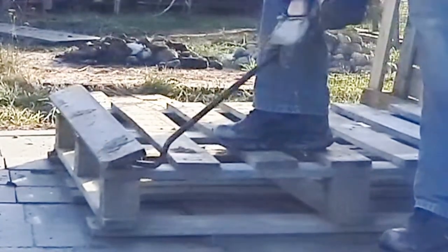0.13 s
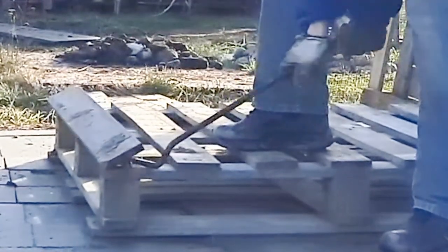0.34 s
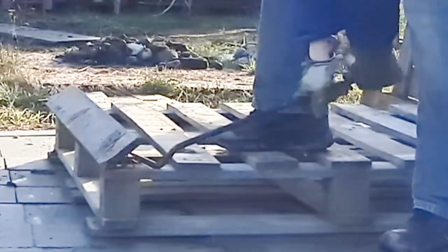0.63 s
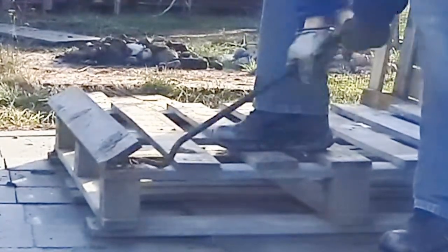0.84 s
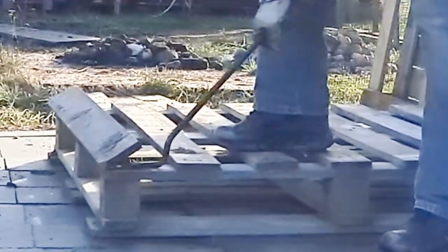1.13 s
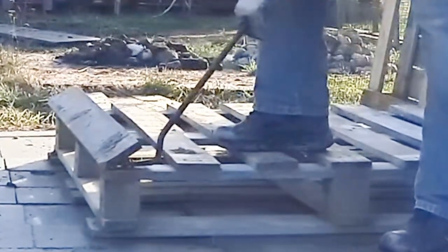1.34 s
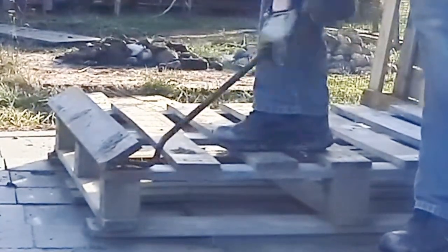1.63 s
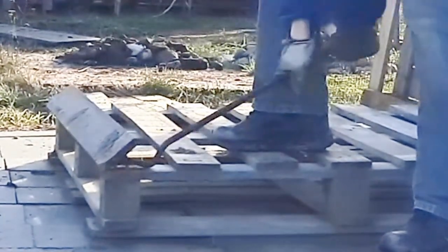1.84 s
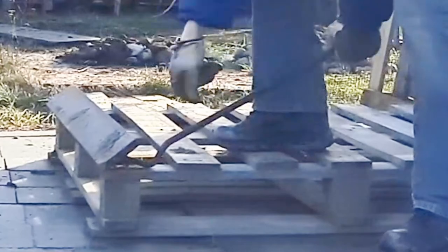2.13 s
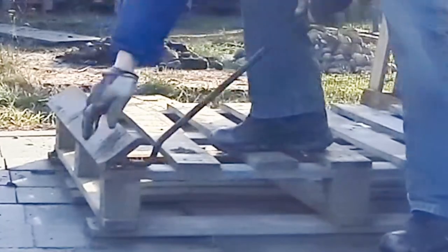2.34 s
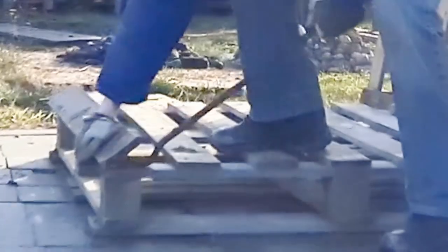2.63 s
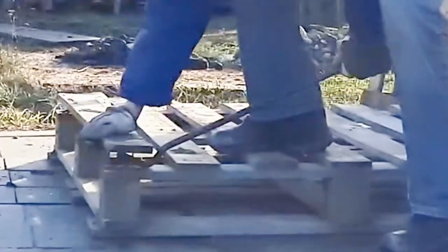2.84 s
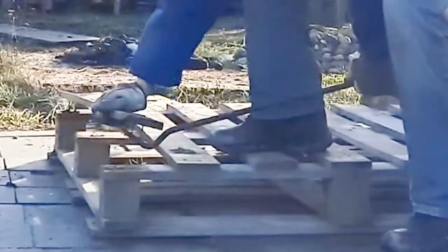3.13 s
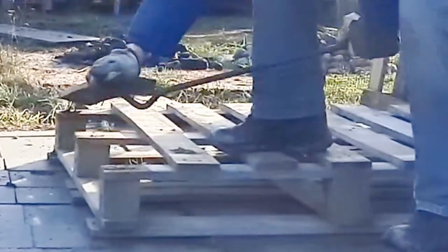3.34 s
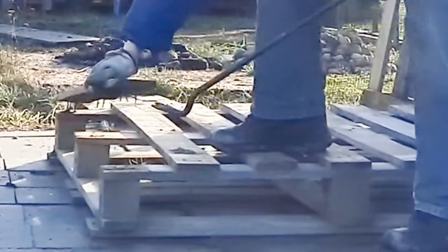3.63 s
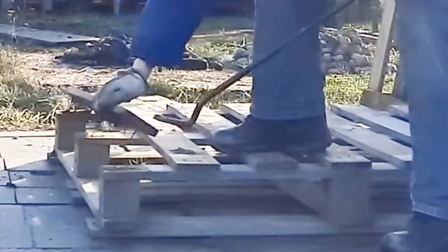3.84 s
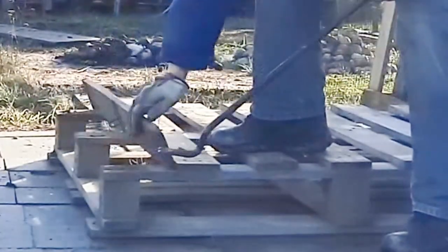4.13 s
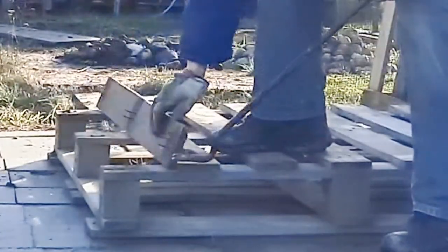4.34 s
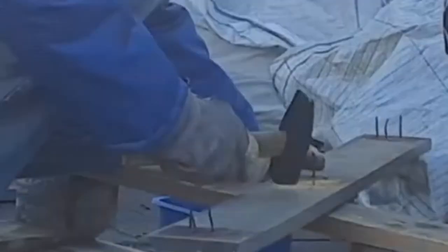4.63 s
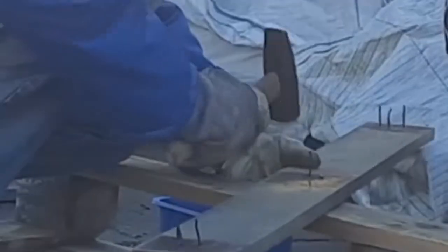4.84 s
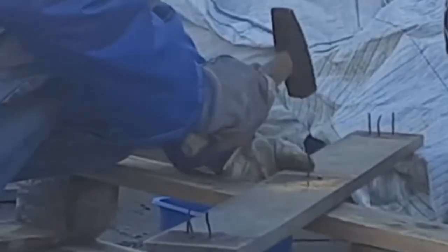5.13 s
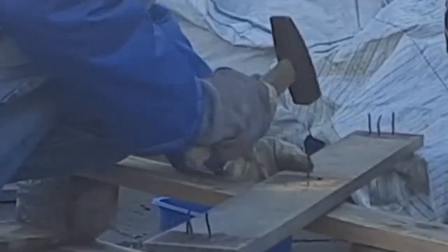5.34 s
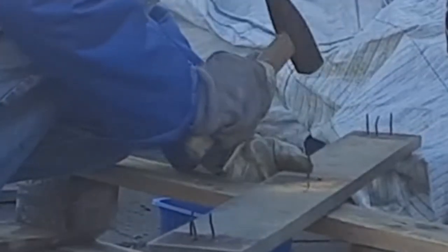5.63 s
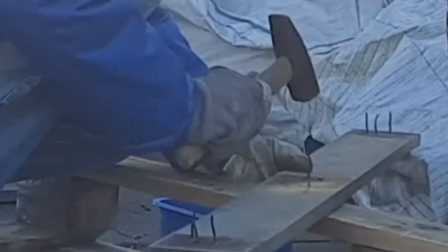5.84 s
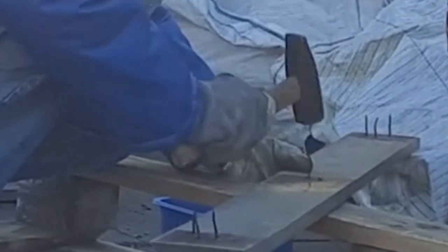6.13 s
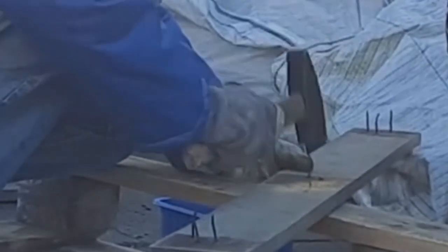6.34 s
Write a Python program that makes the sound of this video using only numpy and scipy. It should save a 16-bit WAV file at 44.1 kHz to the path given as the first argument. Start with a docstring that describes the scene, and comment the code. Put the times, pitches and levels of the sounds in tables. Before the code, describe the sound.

Quiet yard with low rumble and faint hiss. Steel bites and drags on dry timber, with small squeaks and uneven knocks slightly left of centre, until the board comes free and drops hard on the slats. The place changes to a close view slightly right: four evenly spaced, much louder hammer knocks on a nailed board, a brief nail rattle, and low wind buffets on the microphone.

```python
"""Prying a pallet and hammering out a nail

Outdoors, a steel crowbar bites, scrapes and knocks as it levers a board off an old pallet; the board drops on the slats.
Then, close by, a hammer drives a nail back out of the board in four blows while gusts buffet the microphone.
Impacts are bursts of dense noise modes plus decaying sines; friction, the nail's ping and buzz, and wind are shaped noise.
A low outdoor rumble and a faint hiss lie under everything.
"""
import sys
import numpy as np
from scipy import signal
from scipy.fft import rfft, irfft, next_fast_len
from scipy.io import wavfile
from scipy.ndimage import map_coordinates

SR = 44100
rng = np.random.default_rng(int(sys.argv[2]) if len(sys.argv) > 2 else 0)


def store_pcm(level_fs):
    """Save levels as 16-bit WAV."""
    pcm = np.round(np.clip(level_fs, -1, 1) * 32767).astype(np.int16)
    wavfile.write(sys.argv[1], SR, np.atleast_2d(pcm).T)


N = 286205
TIME = np.arange(N) / SR

# Clear modes of the board. Each row: frequency in Hz, level in dB against the contact's drive, T60 in seconds.
BOARD_MODES = [(343.4, -2.5, 0.17), (356, 1, 0.1), (444, -19.5, 0.3), (535, -16.5, 0.063),
               (581.6, -13, 0.15), (697, -29.5, 0.32), (808, 1, 0.17), (911, -9.5, 0.15), (1087, -16, 0.14),
               (1210, -16.5, 0.039), (1292, -13.5, 0.13), (1425, -18.5, 0.15), (1791, 7, 0.047),
               (2090, -3.5, 0.069), (2223, -3, 0.061), (3150, -15.5, 0.097), (3370, -16, 0.12),
               (6200, 0.5, 0.025), (7420, -0.5, 0.037), (7100, -4, 0.046)]
# Damping of the dense timber modes. Each row: frequency in Hz, usual T60 in seconds.
WOOD_DECAY = [(250, 0.33), (700, 0.19), (1500, 0.11), (4000, 0.19), (7000, 0.12), (14000, 0.1)]
# Borders in Hz between the five zones of a contact: thud, knock, crack, snap and tick.
ZONE_EDGES_HZ = [700, 1600, 4500, 9000]


def from_db(db):
    """The decibel is logarithmic: 20 dB is a factor of ten in amplitude."""
    return 10 ** (np.asarray(db) / 20)


def rms_one(x):
    """Normalise to unit mean power."""
    return x / np.sqrt(np.mean(x ** 2) + 1e-20)


def at_hz(points, hz):
    """Interpolate a table along log frequency, the scale of pitch."""
    known, values = np.transpose(points)
    return np.interp(np.log(np.maximum(hz, 1)), np.log(known), values)


def noise(colour, likeness=((100, 0), (1000, 0))):
    """Coloured stereo noise: mixing independent mid and side parts sets the channels' correlation; rms 1."""
    size = next_fast_len(N)
    hz = np.fft.rfftfreq(size, 1 / SR)
    mid, side = rfft(rng.standard_normal((2, size))) * from_db(at_hz(colour, hz))
    alike = np.clip(at_hz(likeness, hz), -1, 1)
    spectrum = np.sqrt(1 + alike) * mid + np.sqrt(1 - alike) * side * [[1], [-1]]
    return rms_one(irfft(spectrum, size)[:, :N])


def flicker(rate, depth_db):
    """Random amplitude modulation: a gain drawn `rate` times a second and joined by lines in dB; rms 1."""
    points = np.arange(0, TIME[-1] + 1, 1 / rate)
    return rms_one(from_db(depth_db * np.interp(TIME, points, rng.standard_normal(len(points)))))


def band(x, low_hz, high_hz):
    """A causal band-pass resonates within its band; rms 1."""
    sos = signal.butter(2, [low_hz, high_hz], "band", fs=SR, output="sos")
    return rms_one(signal.sosfilt(sos, x))


def jittering(modes):
    """Resonances excited by countless tiny slips, independent in each channel; rms 1."""
    slips = rng.standard_normal((2, N))
    return rms_one(sum(from_db(db) * band(slips, hz - width / 2, hz + width / 2) for hz, db, width in modes))


def from_side(x, lag_ms):
    """Interaural delay: the left channel lags (positive) or leads (negative) for a source off centre."""
    left = map_coordinates(x[0], [np.arange(N) - lag_ms * SR / 1000], order=3)
    return np.array([left, x[1]])


def by_place(levels_db):
    """Ambient level depends on place: the gain moves from its pallet value to its hammering value."""
    move_s, fade_s = 4.63, 0.082
    return from_db(np.interp(TIME, [move_s, move_s + fade_s], levels_db))


def breeze_strength():
    """Wind noise follows air speed, here a gain joined by straight lines in dB."""
    # Strength of the breeze on the microphone. Each row: time in seconds, relative level in dB.
    breeze_levels = [(4.7, -64), (5.12, -54.5), (5.4, -59), (5.55, -47), (5.72, -44.5), (5.9, -29.5),
                     (6.25, -41.5), (6.49, -32)]
    s, db = np.transpose(breeze_levels)
    return from_db(np.interp(TIME, s, db))


def outdoors():
    """Diffuse ambience: far rumble, its long waves alike in both channels, and hiss growing with the breeze."""
    # Spectrum of the rumble. Each row: frequency in Hz, relative level in dB per hertz.
    rumble_colour = [(12, -32.5), (20, -37.5), (43, -5), (92, 2.5), (121, -4), (192, -4.5), (258, -16),
                     (318, -12.5), (418, -31), (750, -26), (1070, -36.5), (1670, -47.5), (2150, -46),
                     (3000, -58.5), (3900, -87.5), (6600, -120)]
    # Correlation of the rumble. Each row: frequency in Hz, left-right likeness from 0 to 1.
    rumble_likeness = [(60, 1), (130, 1), (290, 0.94), (640, 0.63), (1400, 0.029)]
    # Spectrum of the hiss. Each row: frequency in Hz, relative level in dB per hertz.
    hiss_colour = [(300, -1.5), (800, 15.5), (1200, 3.5), (1700, 1), (2400, -2.5), (4800, -7), (7500, 1),
                   (8300, 1), (9200, -14), (11200, -5.5), (16000, -6.5)]
    # Background levels: at the pallet in dB, at the hammering in dB (for the hiss, in the weakest breeze).
    rumble_db = (-52, -62)
    hiss_db = (-76.5, -74)
    rumble = by_place(rumble_db) * flicker(rate=12, depth_db=1.1) * noise(rumble_colour, rumble_likeness)
    breeze = breeze_strength()
    hiss_growth = (breeze / breeze[0]) ** 0.17
    return rumble + by_place(hiss_db) * hiss_growth * noise(hiss_colour)


def buffet_strength():
    """Gusts are intermittent: each strong buffet is a smooth hump of gain."""
    # The strongest buffets. Each row: centre in seconds, relative level in dB.
    gusts = [(4.935, -49.5), (5.135, -48.5), (5.258, -42.5), (5.68, -44.5), (5.785, -33.5), (5.87, -18),
             (5.967, -19), (6.028, -40), (6.083, -23.5), (6.27, -32), (6.415, -29)]
    half_s = 0.039
    return sum(from_db(db) * np.cos(np.pi / 2 * np.clip((TIME - s) / half_s, -1, 1)) ** 4 for s, db in gusts)


def wind(steady_db, buffet_db, flutter_db):
    """Turbulent pressure: eddies differ partly between channels, and the hardest buffets flutter higher up."""
    # Spectrum of the eddies. Each row: frequency in Hz, relative level in dB per hertz.
    eddy_colour = [(12, -39.5), (22, -15.5), (45, -1), (85, 6), (165, -0.5), (250, -9), (330, -12),
                   (420, -20), (900, -46.5), (1500, -87.5)]
    eddies = noise(eddy_colour, likeness=[(50, 0.25), (150, 0.31), (400, 0)])
    buffets = buffet_strength()
    strength = from_db(steady_db) * breeze_strength() + from_db(buffet_db) * buffets
    lumps = flicker(rate=150, depth_db=4)
    # squaring favours the hardest buffets
    flutter = band(rng.standard_normal((2, N)), 270, 530) * lumps * buffets ** 2 / buffets.max()
    return eddies * strength + from_db(flutter_db) * flutter


def dense_modes():
    """High modal density: quarter-octave noise bands stand for the timber's countless modes."""
    edges = np.geomspace(170, 16500, 27)
    white = rng.standard_normal((2, 3, N + SR // 2))   # direct, left and right; neighbours use different noise
    bands = np.array([band(white[k % 2], *edges[k:k + 2]) for k in range(len(edges) - 1)])
    return np.sqrt(edges[1:] * edges[:-1]), bands


def contacts(rows, shares, crack_db, free_db):
    """Contact stiffness tilts the spectrum: hard contacts are brighter.

    Each doubling of crunch time adds crack_db to the crack; each doubling of ring length adds free_db to the modes.
    """
    pivot_hz, usual_crunch_s = 1000, 0.002
    edges = np.array([170, *ZONE_EDGES_HZ, 16500])
    octaves = np.log2(np.sqrt(edges[1:] * edges[:-1]) / pivot_hz)
    is_crack = np.array([0, 0, 1, 0, 0])
    out = []
    for s, db, hardness, crunch, length in rows:
        extra_crack = is_crack * crack_db * np.log2(crunch / usual_crunch_s)
        contact_db = shares + hardness * octaves + extra_crack
        out.append((s, db, contact_db, free_db * np.log2(length), crunch, length))
    return out


def blows(rows, timber, colour, decay, modes, dense_db, ring_db, grit_db, scatter, echo_db, echo_t60):
    """Impact excitation: a gritty, fast-dying burst of dense modes, clear modes, and faint scatter from the yard."""
    bite_hz, bite_s = 2500, 0.0045
    hz, bands = timber
    t = np.arange(SR * 2 // 5) / SR
    out = np.zeros((2, N + len(t)))
    shape = from_db(at_hz(colour, hz)) * np.sqrt(hz)   # level per hertz to level per band
    zone = np.digitize(hz, ZONE_EDGES_HZ)
    zone_db = 10 * np.log10(np.bincount(zone, shape ** 2))
    zone_hz = np.exp(np.bincount(zone, np.log(hz)) / np.bincount(zone))
    # treble arrives more diffusely
    spread = np.clip(scatter * (hz / 1000) ** .5, 0, .9)[:, None, None]
    echo = from_db(echo_db - 60 * t / echo_t60) * (1 - np.exp(-t / 0.012))
    # fibres give way in tiny jerks
    grit = np.pad(flicker(rate=1500, depth_db=grit_db), (0, len(t)), mode="edge")
    # extra treble at the start of each contact
    bite = 1 + np.minimum(hz[:, None] / bite_hz, 3) * np.exp(-t / bite_s)
    mode_hz, mode_db, mode_t60 = np.transpose(modes)[:, :, None]
    for s, level_db, contact_db, free_db, rise, length in rows:
        start = round(s * SR)
        span = slice(start, start + len(t))
        grain = bands[:, :, span]
        attack = 1 - np.exp(-t / max(rise, 1e-4))
        # the contact sets the share of thud, knock, crack, snap and tick
        gain = shape * from_db(dense_db + at_hz(np.c_[zone_hz, contact_db - zone_db], hz))
        decaying = from_db(-60 * t / (length * at_hz(decay, hz)[:, None]))
        dying = attack * bite * grit[span] * decaying
        burst = (np.sqrt(1 - spread ** 2) * grain[:, :1] + spread * grain[:, 1:]) * dying[:, None]
        # each band gets the energy of 20 ms at rms 1
        strength = np.sqrt(np.sum(burst ** 2, axis=(1, 2)) / (2 * .02 * SR))
        dense = np.tensordot(gain / strength, burst, 1)
        reflections = echo * np.tensordot(gain, grain[:, 1:], 1)
        # the same contact drives the clear modes, each a little differently every time
        drive_db = at_hz(np.c_[zone_hz, contact_db], mode_hz) + 2 * rng.standard_normal(mode_hz.shape)
        sines = np.sin(2 * np.pi * (mode_hz * t + rng.random(mode_hz.shape)))
        ring = (from_db(mode_db + drive_db - 60 * t / mode_t60) * sines).sum(axis=0)
        ring = from_db(ring_db + free_db) * attack * ring
        out[:, span] += from_db(level_db) * (dense + reflections + ring)
    return out[:, :N]


def prying(timber):
    """Steel-on-wood impact: the crowbar bites and knocks, exciting the modes of the pallet."""
    # Crowbar contacts. Each row: start in seconds, relative level in dB, hardness in dB per octave,
    # crunch (rise) time in seconds, ring length as a factor.
    pry_contacts = [(0.133, -66.5, -6, 0.0011, 0.94), (0.444, -62.5, 4.5, 0.00061, 1.6),
                    (0.496, -65, -0.5, 0.00069, 0.99), (0.571, -74, 6.5, .0012, 0.54),
                    (0.778, -67, 3, 0.00046, 0.78), (1.072, -58, -12.5, 0.0025, 2.2),
                    (1.388, -64.5, 2.5, 0.0011, .9), (1.829, -35, 0, 0.0014, 0.59),
                    (2.383, -42, -2, 0.006, 0.63), (2.394, -49.5, -6, 0.0017, 0.52),
                    (2.599, -58, -7, .0013, 2.3), (2.705, -63, 0, .002, 0.74),
                    (2.821, -51, -0.5, 0.0019, 1.7), (2.885, -51, 1.5, 0.0063, 1.27),
                    (2.972, -60.5, -2.5, 0.0054, 0.85), (3.483, -51.5, 2.5, 0.0017, 0.75),
                    (3.508, -50.5, 1.5, 0.00069, 1.3), (3.558, -64.5, 6, 0.0027, .8),
                    (3.583, -53, 4, .0014, 1.06)]
    # Shares at hardness 0 and usual crunch: thud, knock, crack, snap and tick, all in dB.
    pry_shares = (-4.5, -1.5, -5, -12.5, -18)
    # Colour of the contacts. Each row: frequency in Hz, relative level in dB per hertz.
    pallet_colour = [(120, -35), (220, -4), (590, -3), (720, -5), (900, -5), (1150, -4), (1600, -16.5),
                     (2250, -22.5), (3000, -27), (3900, -35.5), (5200, -28.5), (6300, -25.5), (7900, -29.5),
                     (9200, -58), (11500, -23), (16000, -47)]
    # Clear modes of the pallet. Each row: frequency in Hz, level in dB against the drive, T60 in seconds.
    pallet_modes = [(306.6, -5.5, .15), (520, -4.5, 0.097), (620, 1, 0.055), (797.4, 0, 0.13),
                    (1057, 0, 0.11), (1145, 2, 0.071), (1313, -8, 0.15), (1414, -2.5, 0.071),
                    (1760, -8.5, 0.11), (2216, -3, 0.08), (2597, -7.5, 0.07), (3080, -10.5, 0.059),
                    (3600, -13, 0.1), (5010, -11, 0.058), (6080, -7, 0.087), (7130, 0, 0.08),
                    (7900, -2.5, 0.096)]
    rows = contacts(pry_contacts, pry_shares, crack_db=4.0, free_db=-0.5)
    return blows(rows, timber, pallet_colour, WOOD_DECAY, pallet_modes, dense_db=-6.0, ring_db=-1,
                 grit_db=2.0, scatter=0.54, echo_db=-14.5, echo_t60=0.35)


def rubbing(grate_db, rasp_db, rough_db):
    """Sliding friction: steel and glove drag unevenly over wood fibres; strokes build up, hold and die away."""
    # Strokes of bar and glove. Each row: start in seconds, length in seconds, level in dB (-70.5 is firm).
    strokes = [(0.548, .07, -76.5), (0.763, 0.17, -84.5), (1.07, 0.16, -84.5), (1.616, 0.24, -76.5),
               (1.88, 0.11, -75), (2.229, 0.18, -69), (2.498, 0.15, -72.5), (2.712, 0.24, -71.5),
               (3.15, .12, -79.5), (3.359, 0.14, -73), (4.3, 0.24, -81), (4.619, 0.23, -76)]
    # Spectra of the low grating and the high rasp. Each row: frequency in Hz, relative level in dB per hertz.
    grate_colour = [(400, 4.5), (800, 3), (1400, -5), (2300, -10), (3500, -33), (6000, -30)]
    rasp_colour = [(1760, -22.5), (3000, -5.5), (4350, -8.5), (5000, -5), (7620, 2), (9330, -19),
                   (11000, -12), (15100, -18), (16000, -5.5)]
    firm_db, attack_s, t60_s = -70.5, 0.041, 0.45
    pressure = np.zeros(N)
    for s, length, db in strokes:
        held = from_db(db - firm_db - 60 * np.maximum(TIME - s - length, 0) / t60_s)
        pressure += held * np.clip((TIME - s) / attack_s, 0, 1)
    scrape = from_db(grate_db) * noise(grate_colour) + from_db(rasp_db) * noise(rasp_colour)
    uneven = flicker(rate=30, depth_db=1.5)
    return scrape * pressure * uneven * flicker(rate=400, depth_db=rough_db)


def squeaks(slips_per_s, level_db):
    """Stick-slip friction: steel catches on a nail, and each random slip rings one mode of the bar."""
    # Squeaks of the bar. Each row: start in seconds, length in seconds, relative level in dB.
    squeak_times = [(0.864, 0.092, -75.5), (1.079, 0.12, -71.5), (1.67, 0.064, -70.5), (1.867, 0.13, -76),
                    (2.268, 0.025, -61)]
    mode_hz, width_hz, attack_s, fade_s = 2138, 80, 0.009, 0.076
    slips = (rng.random(N) < slips_per_s / SR) * rng.uniform(0.18, 1, (2, N))
    r = np.exp(-np.pi * width_hz / SR)   # pole radius of the resonator
    poles = [1, -2 * r * np.cos(2 * np.pi * mode_hz / SR), r * r]
    tone = signal.lfilter([1, 0, -1], poles, slips + 1e-18)
    pressure = np.zeros(N)
    for s, length, db in squeak_times:
        fade = np.clip((s + length - TIME) / fade_s + .5, 0, 1)
        pressure += from_db(db) * np.clip((TIME - s) / attack_s, 0, 1) * fade
    return from_db(level_db) * pressure * rms_one(tone)


def nail_ping():
    """Free decay: the last nail scrapes and springs out of its hole, and its modes ring briefly."""
    # Modes of the freed nail. Each row: frequency in Hz, relative level in dB, width in Hz.
    ping_modes = [(2620, -5, 41), (3900, -2, 80), (4460, 3, 110), (4820, 2, 130), (14000, 4, 300)]
    start_s, level_db, t60_s = 3.583, -48, 0.079
    age = np.maximum(TIME - start_s, 0)
    return from_db(level_db - 60 * age / t60_s) * (age > 0) * jittering(ping_modes)


def board_drop(timber):
    """Repeated impact: the loose board lands on the slats and settles, exciting its own modes."""
    # Landings. Each row: start in seconds, relative level in dB, hardness in dB per octave,
    # crunch (rise) time in seconds, ring length as a factor.
    landings = [(3.972, -27.5, 0, 0.0019, 0.72), (4.013, -44.5, 1, 0.0034, 0.97),
                (4.438, -58, -9, 0.0019, 2.5), (4.492, -51, 3.5, 0.0038, 0.74),
                (4.512, -56.5, -2, 0.0028, 0.37), (4.541, -65.5, 5, 0.0022, .5),
                (4.565, -56, -3, .001, 1.8)]
    # Shares at hardness 0 and usual crunch: thud, knock, crack, snap and tick, all in dB.
    drop_shares = (-5.5, 1, -16.5, -28.5, -55)
    # Colour of the landings. Each row: frequency in Hz, relative level in dB per hertz.
    landing_colour = [(94, -46), (160, -10.5), (308, 6), (692, -11), (807, -11.5), (960, -12.5),
                      (1100, -22), (1410, -9.5), (1520, -20), (1810, -22), (1960, -19.5), (7840, -60),
                      (16000, -75)]
    rows = contacts(landings, drop_shares, crack_db=5.5, free_db=-0.5)
    return blows(rows, timber, landing_colour, WOOD_DECAY, BOARD_MODES, dense_db=-3.0, ring_db=-3.2,
                 grit_db=1.0, scatter=0.48, echo_db=-27, echo_t60=0.86)


def hammering(timber):
    """Driven impact: four hammer blows and one light knock reach the board's modes through the nail."""
    # Hammer contacts. Each row: start in seconds, relative level in dB, hardness in dB per octave,
    # crunch (rise) time in seconds, ring length as a factor.
    hammer_contacts = [(5.448, -26, 0.31, .0013, 1), (5.768, -23, 0.71, 0.0018, 1),
                       (5.848, -47.5, -2.4, 0.0016, 0.29), (6.077, -20, -0.56, 0.0015, 1),
                       (6.394, -21.5, -0.59, 0.0033, 0.98)]
    # Shares at hardness 0 and usual crunch: thud, knock, crack, snap and tick, all in dB.
    hammer_shares = (2, -0.5, -4, -12.5, -21)
    # Colour of the blows. Each row: frequency in Hz, relative level in dB per hertz.
    nail_colour = [(120, -15.5), (200, -4.5), (366, 2), (671, -5.5), (1100, -7.5), (1530, -11.5),
                   (2200, -13), (2700, -36.5), (3500, -31.5), (5200, -46), (7300, -33), (9400, -40.5),
                   (12400, -24), (16000, -53.5)]
    # Damping of the dense modes. Each row: frequency in Hz, usual T60 in seconds.
    nail_decay = [(250, 0.13), (700, 0.054), (1500, .07), (2300, 0.075), (5000, 0.11), (14000, 0.03)]
    rows = contacts(hammer_contacts, hammer_shares, crack_db=8.0, free_db=5)
    return blows(rows, timber, nail_colour, nail_decay, BOARD_MODES, dense_db=-9, ring_db=-3,
                 grit_db=3, scatter=0.26, echo_db=-12.5, echo_t60=0.32)


def nail_buzz():
    """Loose-contact rattle: after the second blow the nail buzzes loudly, then weakly until it sticks again."""
    # Modes of the nail rattling in the board. Each row: frequency in Hz, relative level in dB, width in Hz.
    buzz_modes = [(2240, -1.5, 90), (2540, -1, 120), (2910, -3, 200), (3130, -3, 85), (3520, -3, 120),
                  (3840, -8.5, 150)]
    start_s, length_s, stop_s = 5.768, 0.21, 0.04
    burst_db, burst_t60_s = -34, 0.086
    rattle_db, rattle_t60_s = -57.5, 0.65
    age = np.maximum(TIME - start_s, 0)
    level = from_db(burst_db - 60 * age / burst_t60_s) + from_db(rattle_db - 60 * age / rattle_t60_s)
    loose = (age > 0) * np.clip(1 - (age - length_s) / stop_s, 0, 1)
    return level * loose * jittering(buzz_modes) * flicker(rate=270, depth_db=3.0)


def scene():
    """Superposition: prying and the falling board a little to the left, hammering to the right."""
    air = outdoors() + wind(steady_db=1.5, buffet_db=-1.5, flutter_db=-24.0)
    timber = dense_modes()
    pallet = prying(timber) + nail_ping() + board_drop(timber)
    pallet = from_side(pallet, lag_ms=-0.038) * from_db([[1.0], [-1.0]])
    friction = rubbing(grate_db=-64.5, rasp_db=-69.0, rough_db=2.0) + squeaks(slips_per_s=450, level_db=-2.5)
    hammer = from_side(hammering(timber), lag_ms=0.13)
    return air + pallet + friction + hammer + nail_buzz()


def record(dry):
    """Band limiting: a steep elliptic low-pass removes everything above 16.1 kHz."""
    return signal.sosfilt(signal.ellip(10, .1, 80, 16100, fs=SR, output="sos"), dry)


dry = scene()
out = record(dry)
store_pcm(out)
```